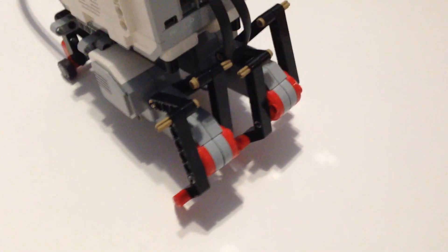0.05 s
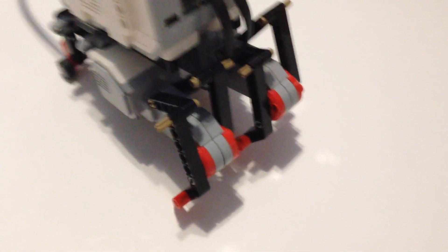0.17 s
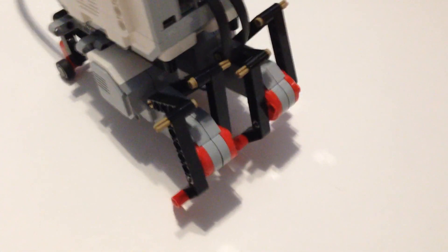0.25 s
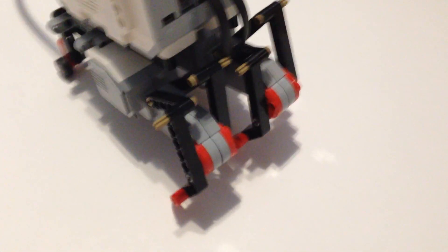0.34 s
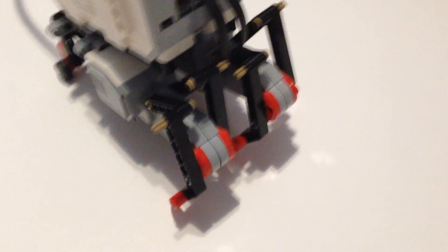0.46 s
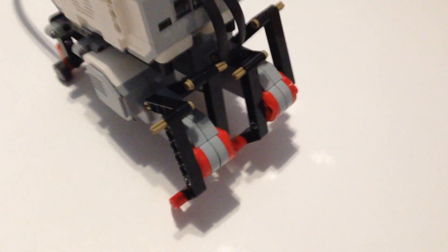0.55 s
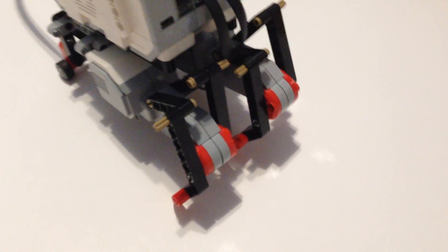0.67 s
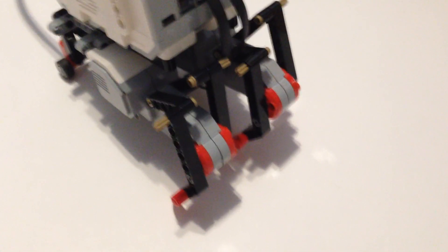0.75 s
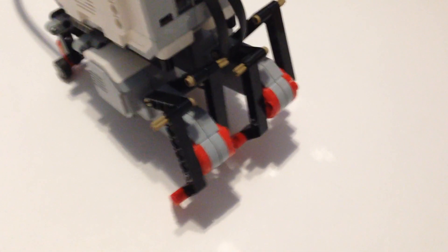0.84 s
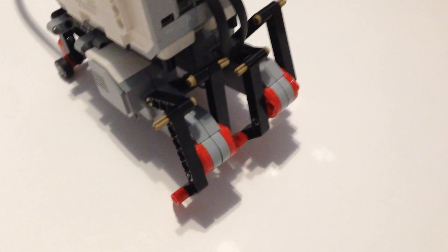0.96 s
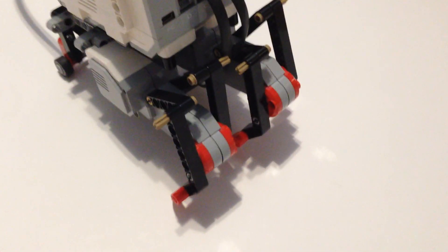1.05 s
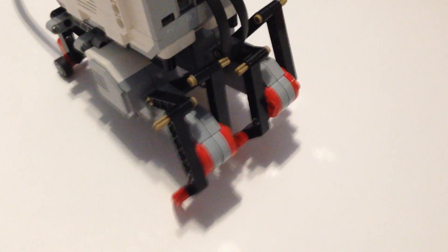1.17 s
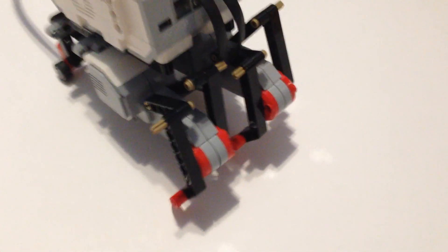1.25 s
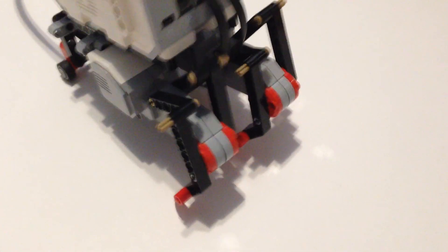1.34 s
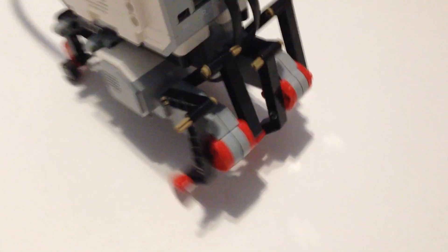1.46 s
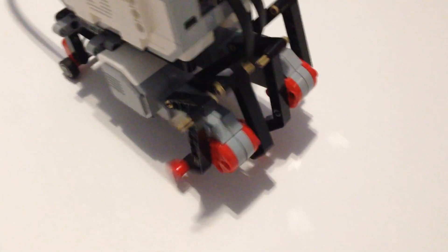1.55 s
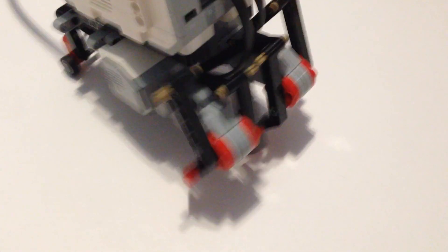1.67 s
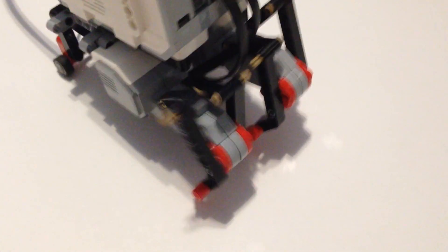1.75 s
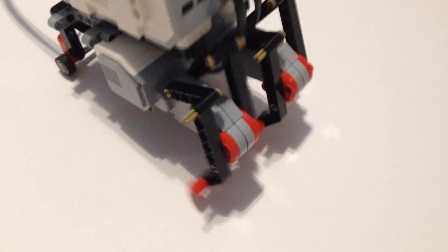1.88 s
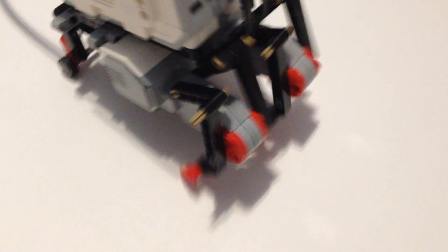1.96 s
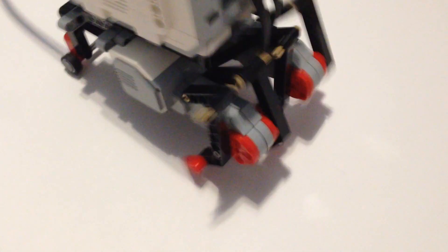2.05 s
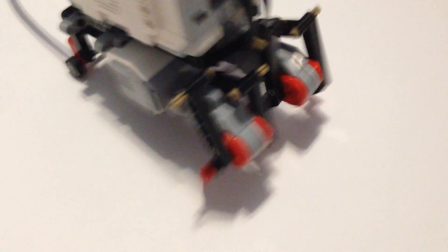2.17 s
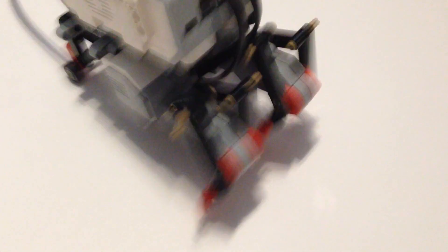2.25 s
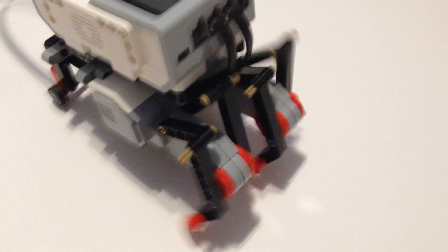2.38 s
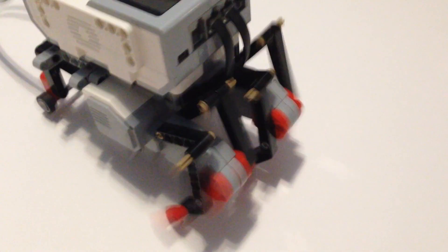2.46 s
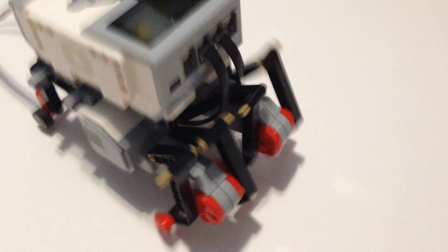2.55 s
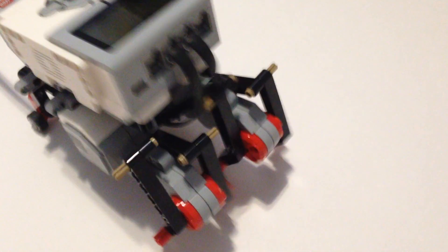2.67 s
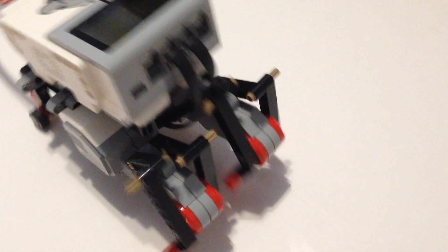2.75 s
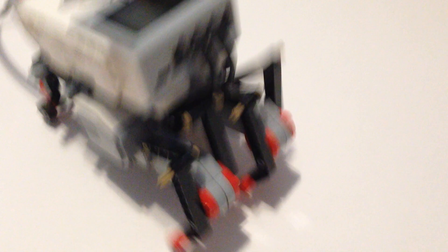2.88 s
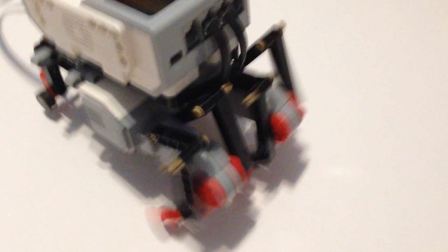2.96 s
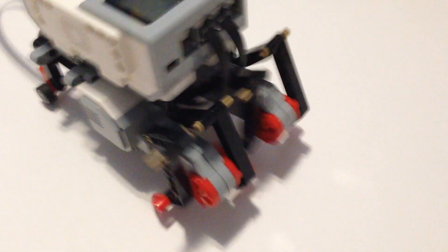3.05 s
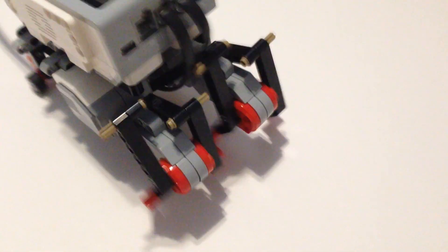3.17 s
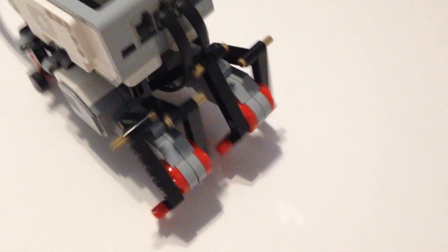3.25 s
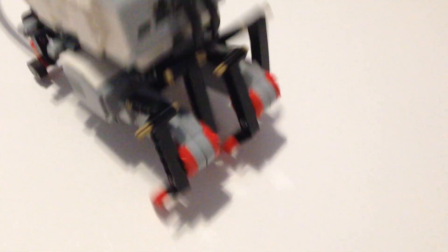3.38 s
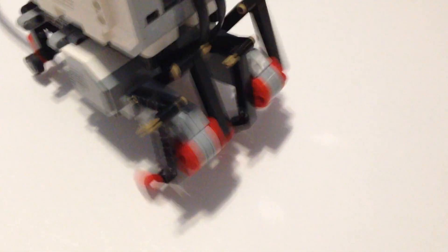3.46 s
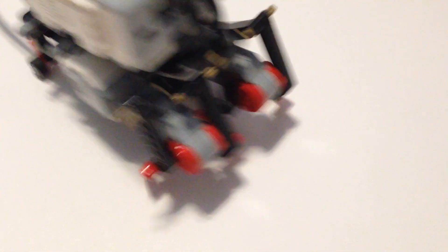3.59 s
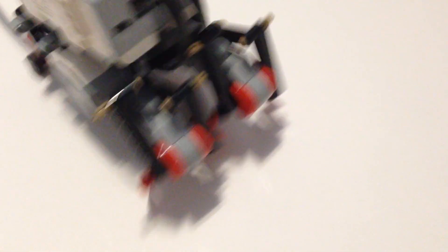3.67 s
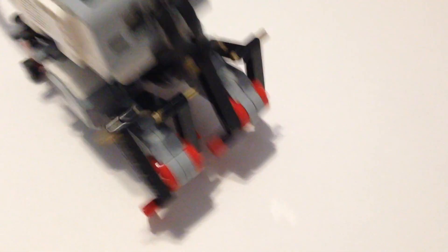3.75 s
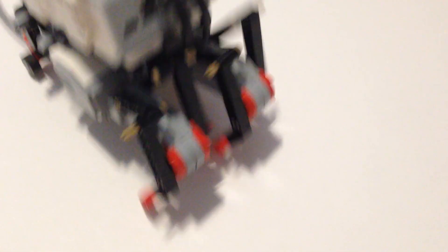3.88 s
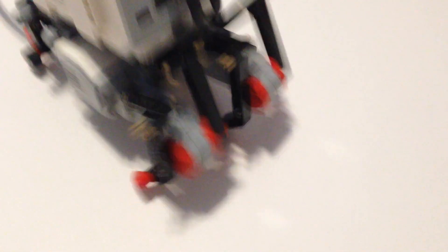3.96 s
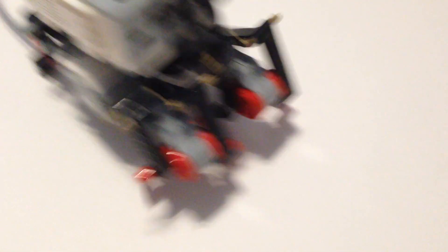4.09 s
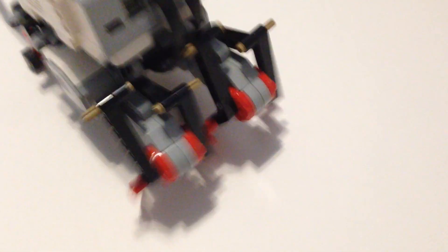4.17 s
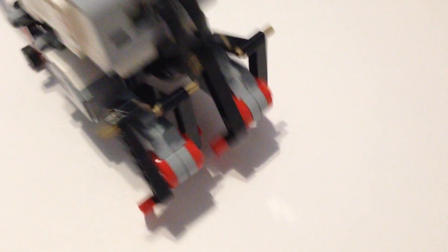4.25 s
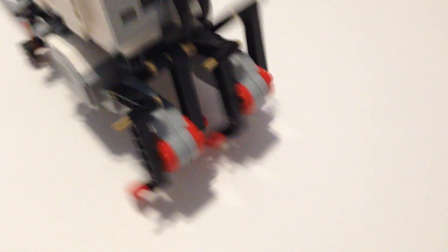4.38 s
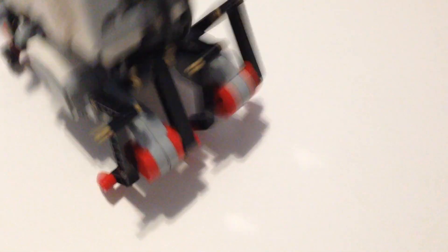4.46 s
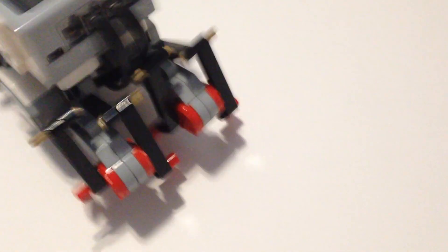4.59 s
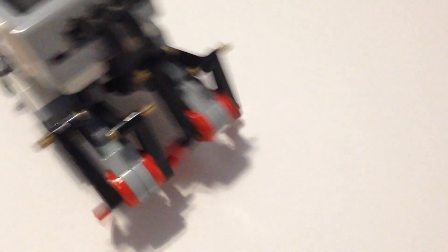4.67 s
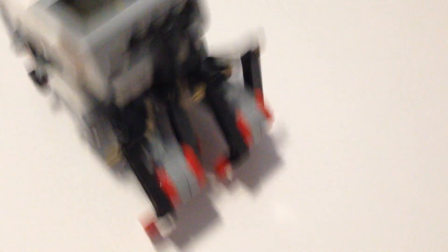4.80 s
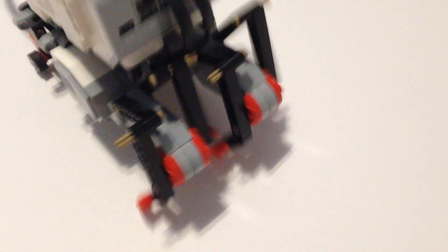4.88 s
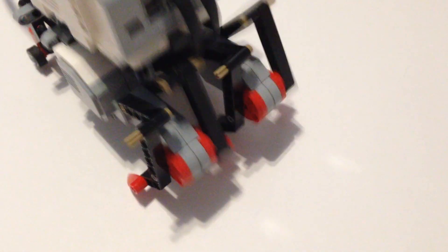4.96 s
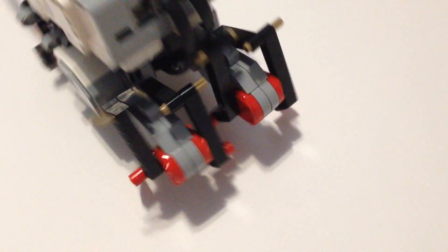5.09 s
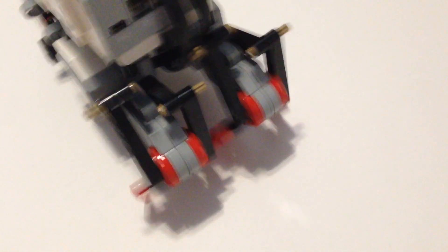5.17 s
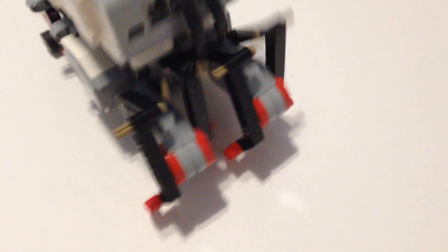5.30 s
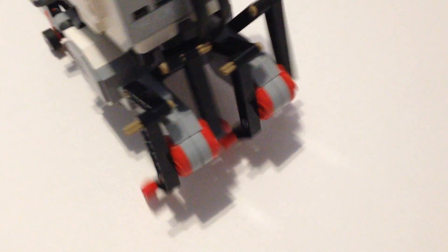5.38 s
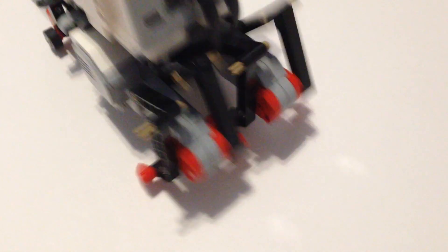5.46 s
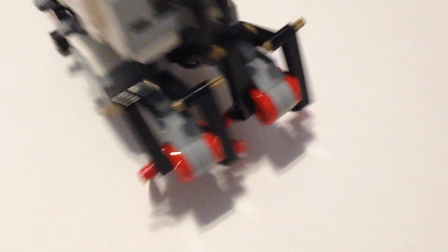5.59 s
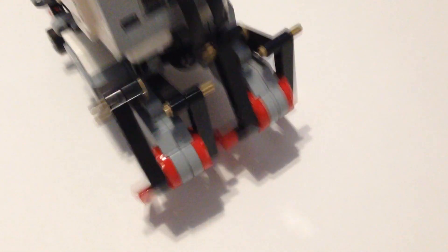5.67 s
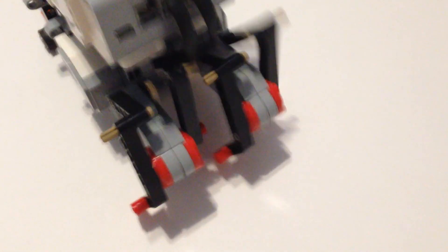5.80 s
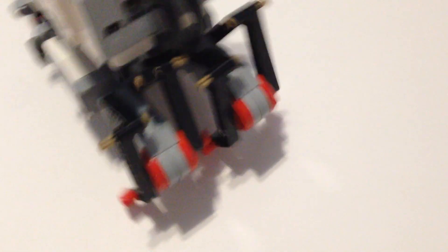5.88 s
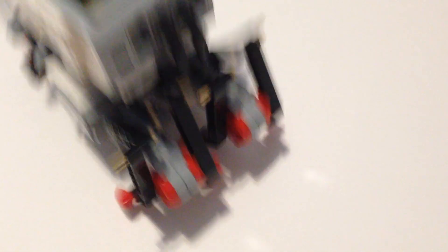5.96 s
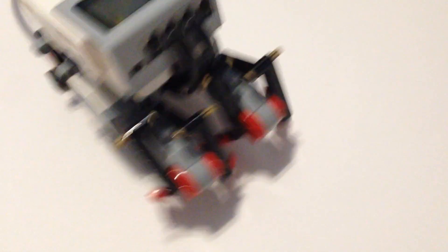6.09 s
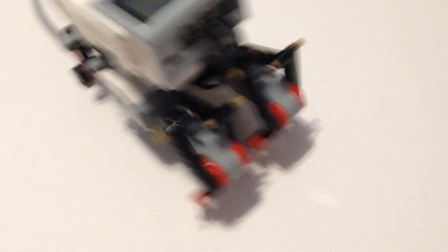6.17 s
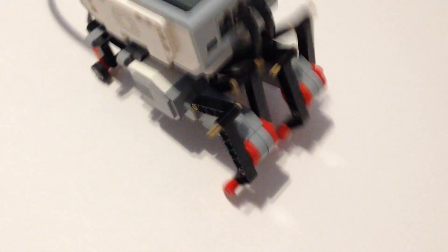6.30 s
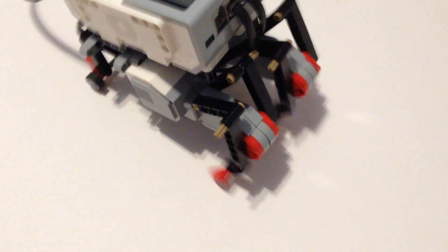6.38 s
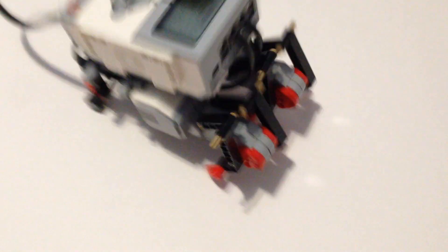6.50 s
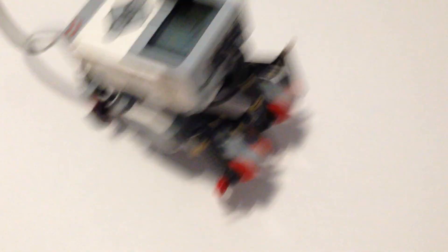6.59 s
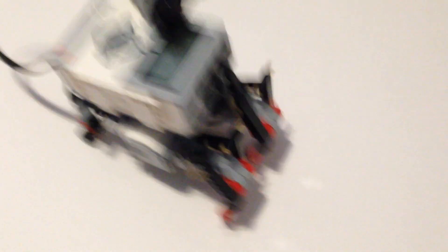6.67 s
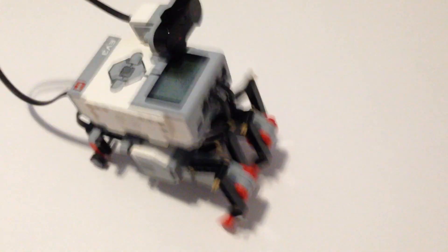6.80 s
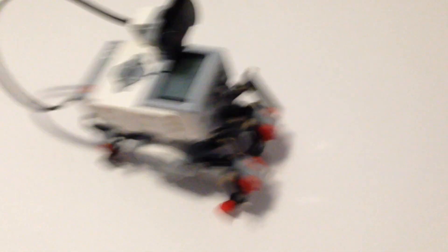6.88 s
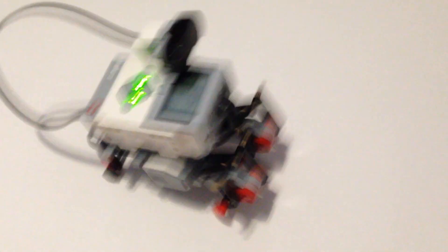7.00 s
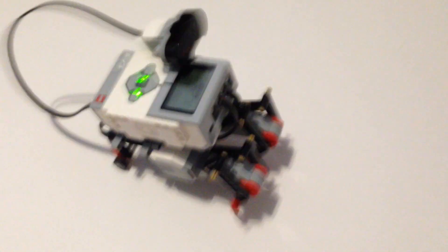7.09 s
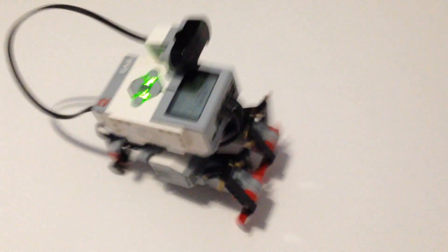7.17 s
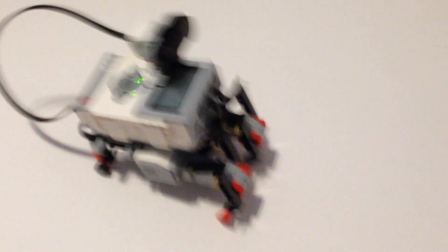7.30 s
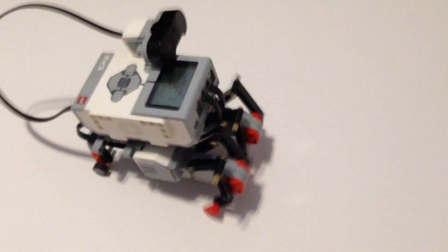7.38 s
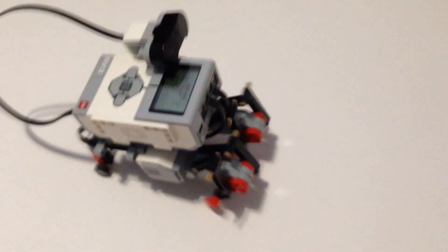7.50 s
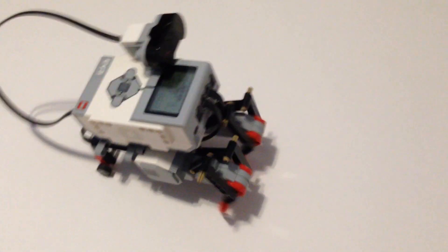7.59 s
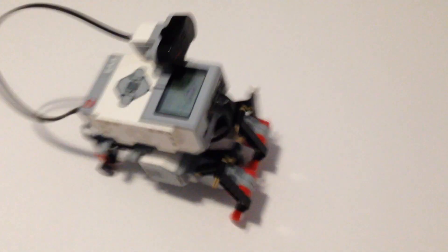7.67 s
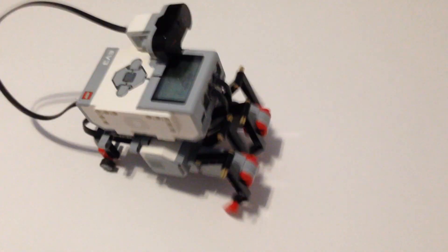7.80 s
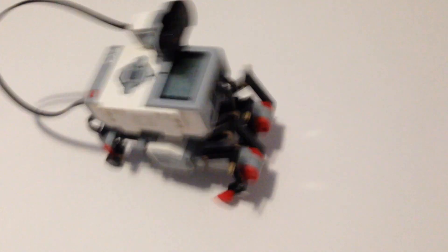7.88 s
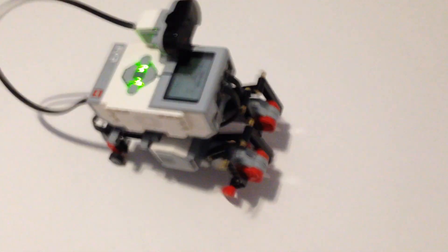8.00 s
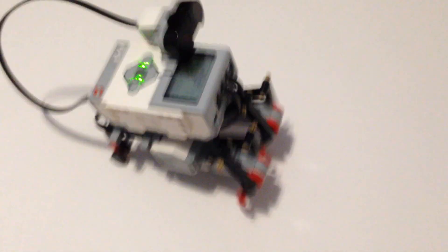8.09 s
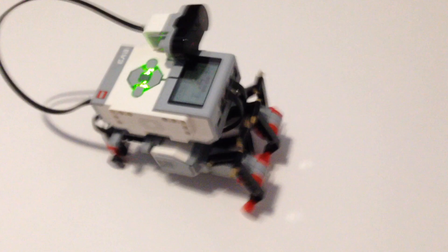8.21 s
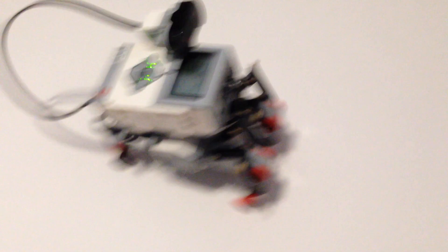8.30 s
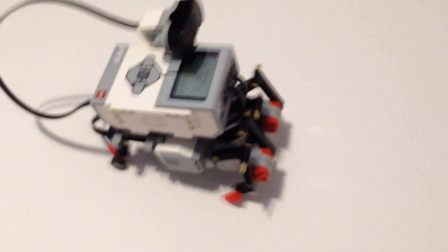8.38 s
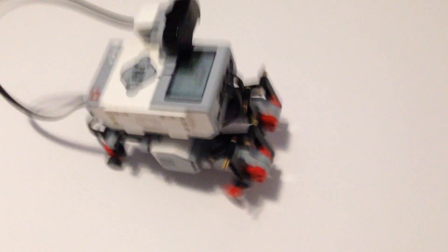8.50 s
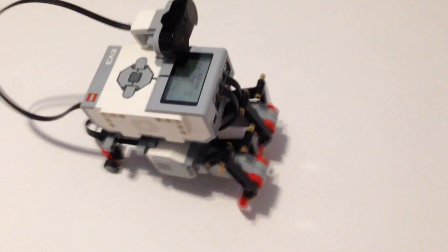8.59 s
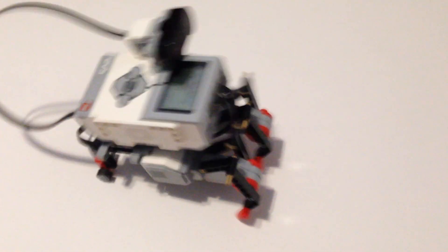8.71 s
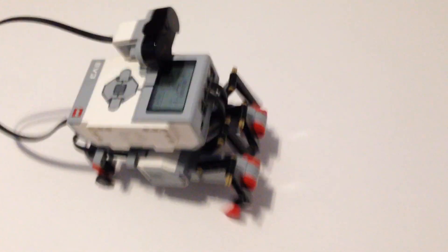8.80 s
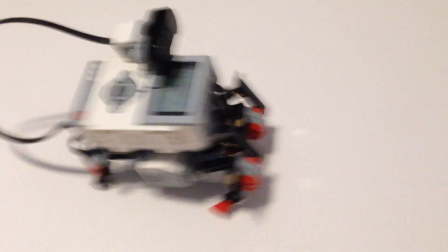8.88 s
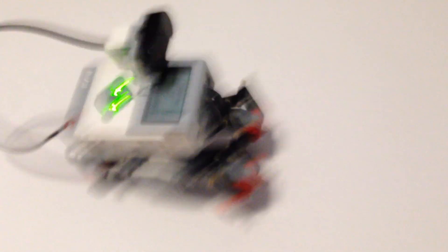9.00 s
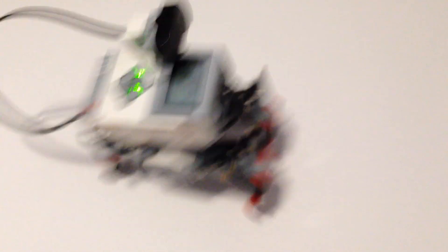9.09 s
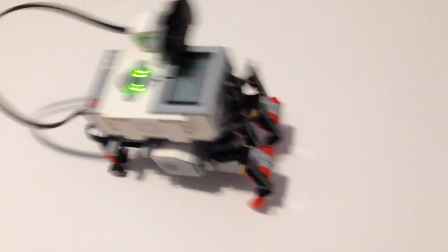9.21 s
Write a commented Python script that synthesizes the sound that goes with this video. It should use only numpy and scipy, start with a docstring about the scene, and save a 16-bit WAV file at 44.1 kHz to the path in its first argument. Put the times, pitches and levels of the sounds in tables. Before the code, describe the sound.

Quiet room hush with faint handling rustle and a few dull plastic clicks, the strongest just over a second in. Then two small geared motors rev up quickly into a bright, grinding rattle with a thin whine. The load surges about twice a second as feet thump the table and loose links clack. Close microphone, drawing back later so everything softens.

```python
"""Walking toy robot

A plastic toy robot stands on a table, gives small clicks, then walks on two geared motors.
Random gear-tooth blows, sliding noise and tones tied to the rotors shake the housing, frame and table.
The load swings with every stride; short rings and noise bursts make feet thump and loose links clack.
Joints squawk as gliding tones. Late in the walk the microphone draws back and the sound grows softer."""
import sys
import numpy as np
from scipy import signal
from scipy.fft import rfft, irfft, next_fast_len
from scipy.io import wavfile
from scipy.ndimage import map_coordinates

SR = 44100
rng = np.random.default_rng(int(sys.argv[2]) if len(sys.argv) > 2 else 0)


def to_wav(s):
    """Save 16-bit WAV."""
    ch = np.atleast_2d(s).T  # columns
    pcm = np.round(np.clip(ch, -1, 1) * 32767)  # PCM
    wavfile.write(sys.argv[1], SR, pcm.astype(np.int16))


N = 407925
TIME = np.arange(N) / SR


def from_db(db):
    """Turn decibels into a gain."""
    return 10 ** (np.asarray(db) / 20)


def rms_one(x):
    """Scale to an average strength (rms) of 1."""
    return x / np.sqrt(np.mean(x ** 2) + 1e-20)


def in_time(rows):
    """Join the rows of a (t, value, ...) table into curves, one value per sample."""
    t, *columns = np.transpose(rows)
    return [np.interp(TIME, t, column) for column in columns]


def drift(rate):
    """Slow random wandering with spread 1, mostly slower than rate (Hz)."""
    step = 40   # samples between the points that are drawn
    r = np.exp(-2 * np.pi * rate * step / SR)
    noise = rng.standard_normal(N // step + 2002)
    slow = signal.lfilter([1], [1, -2 * r, r * r], noise)[2000:]
    return np.interp(np.arange(N) / step, np.arange(len(slow)), rms_one(slow))


def cut(x, hz, kind, order=2):
    """Butterworth filter that keeps the highs ("high") or the lows ("low")."""
    sos = signal.butter(order, min(hz, SR / 2 - 1000), kind, fs=SR, output="sos")
    return signal.sosfilt(sos, x)


def colour(x, spectrum):
    """Shape a steady sound by (f/Hz, level/dB) points."""
    hz, db = np.transpose(spectrum)
    size = next_fast_len(N)
    bins = np.maximum(np.fft.rfftfreq(size, 1 / SR), 1)
    gain = from_db(np.interp(np.log(bins), np.log(hz), db))
    return irfft(rfft(x, size) * gain, size)[:N]


def resonate(x, modes):
    """Let x excite resonances side by side: (f/Hz, width/Hz, level/dB)."""
    out = 0
    for hz, width, db in modes:
        r = np.exp(-np.pi * width / SR)
        poles = [1, -2 * r * np.cos(2 * np.pi * hz / SR), r * r]
        out = out + from_db(db) * (1 - r * r) / 2 * signal.lfilter([1, 0, -1], poles, x)
    return out


def dying(t60):
    """A decay that falls 60 dB in t60 seconds."""
    return from_db(-60 * TIME[:int(t60 * SR) + 2] / t60)


def ring(hz, t60):
    """One struck mode: a dying sine, with little sound below its pitch."""
    decay = dying(t60)
    return cut(decay * np.sin(2 * np.pi * hz * TIME[:len(decay)]), 0.65 * hz, "high")


def crack(t60, low_hz, top_hz, order=2):
    """Countless plastic modes struck at once, as a dying noise burst with peak 1."""
    decay = dying(t60)
    noise = cut(decay * rng.standard_normal(len(decay)), low_hz, "high")
    burst = cut(noise, top_hz, "low", order=order)
    return burst / np.abs(burst).max()


def add(out, t, sound):
    """Mix a sound in at time t (s)."""
    at = min(int(t * SR), N)
    out[at:at + len(sound)] += sound[:N - at]


# colour of the quiet room: (f/Hz, relative level/dB)
AIR = [(15, -54), (25, -26), (36, -11), (59, -2.5), (116, -2.5), (144, -4), (173, -2.5), (482, -19),
       (826, -18.5), (1200, -27.5), (4260, -27), (13500, -31), (15500, -32)]


def room_air():
    """The room's soft hush: steady noise, strongest in the bass."""
    return from_db(-56.5) * rms_one(colour(rng.standard_normal(N), AIR))


# faint rustle of handling: (t/s, base level/dB)
RUSTLE = [(0, -65), (.08, -64), (.15, -81), (.3, -74), (.4, -64), (.47, -67), (.6, -88), (1.3, -95)]


def handling_rustle():
    """Parts rub softly: noise through two broad resonances, its level flickering."""
    noise = resonate(rng.standard_normal(N), [(2200, 1100, 0.5), (4060, 1800, 0)])
    return from_db(in_time(RUSTLE)[0]) * rms_one(noise) * from_db(2.5 * drift(40))


# small knocks before the walk:
# (t/s, ring level/dB, ring f/Hz, ring t60/s, tick base level/dB, tick top f/Hz)
KNOCKS = [(.092, -42, 350, 0.02, -61, 1500), (0.236, -58, 400, .02, -43, 6000),
          (0.493, -42, 400, 0.035, -36.5, 7500), (.497, -31, 264, 0.13, -41, 3200),
          (.509, -35.5, 274, 0.099, -52, 7000), (1.16, -24, 372, 0.036, -21.5, 4300),
          (1.174, -35, 300, .06, -45, 2600), (1.196, -34, 390, 0.025, -36, 2400),
          (1.228, -40, 330, .04, -48, 6500), (1.399, -62, 403, .02, -42, 14500),
          (1.406, -61, 403, .02, -27.5, 14500)]
# resonances of the shell's shiver: (f/Hz, width/Hz, relative level/dB)
SHELL_TAIL_MODES = [(2050, 800, 0), (3700, 1800, -7)]


def knocks():
    """Dull clicks: a low ring and a tick that excites the shell, whose loose parts shiver on."""
    thuds, ticks = np.zeros(N), np.zeros(N)
    for t, db, hz, t60, tick_db, top_hz in KNOCKS:
        add(thuds, t, from_db(db) * ring(hz, t60))
        impulse = cut(signal.unit_impulse(SR // 100), 600, "high", order=1)
        tap = cut(impulse, top_hz, "low", order=10)
        add(ticks, t, from_db(tick_db - 6) * tap / np.abs(tap).max())
        add(ticks, t + 0.00096, from_db(tick_db - 7) * crack(0.017, 660, top_hz, order=10))
    shell = resonate(ticks, [(1950, 800, 2), (4350, 600, 0)])
    shiver = resonate(crack(0.4, 600, 7000), SHELL_TAIL_MODES)
    tail = from_db(-19) * signal.fftconvolve(shell, shiver / np.linalg.norm(shiver))[:N]
    return thuds + ticks + shell + tail


# pace of the walk: (t/s, strides made)
PACE = [(1.38, -1), (1.872, 0), (4.359, 5), (9.255, 15.025)]
# Twice in a stride the gears go slack and race; then a leg takes the weight, they whine and slow down.
# (share of the stride, speed factor, then base swings in level/dB of the bright rattle, low rattle,
# whine and frame drone)
STRIDE = [(.01, 1.025, -0.5, -2.5, -12, 5), (.07, 1.008, 0.1, 0.5, 7, -6), (.14, .99, -1.1, 1, -9, -4),
          (.28, .982, -0.8, -1.5, -0.5, -2), (.39, .99, -0.84, 1.2, -33, -0.5),
          (.46, 1.015, -3, -5.5, -17, 2), (.57, 1.014, -0.3, 1.5, -2, -0.5),
          (.68, .99, -0.74, 0.3, 1.5, -4.5), (.8, .978, -0.75, 0, -10, -0.5),
          (.89, .992, 0.1, 1.5, -15, 1.5), (.96, 1.012, -3, -4, -19, -2)]


def gait():
    """What every stride does to the drive, sample by sample; the pattern sets in with the first steps."""
    strides, = in_time(PACE)
    share, speed, *swings_db = np.transpose(STRIDE)
    walking = np.interp(TIME, [1.8, 2.3], [0, 1])
    factor = 1 + walking * np.interp(strides, share, speed - 1, period=1)
    return [factor] + [walking * np.interp(strides, share, db, period=1) for db in swings_db]


# a leg binds for a moment and the gears surge against it: (middle t/s, half length/s, extra load level/dB)
BINDS = [(2.408, .02, 3.5), (2.583, .016, 5.5), (2.901, .015, 2), (3.073, 0.0099, 6), (3.093, .012, 5),
         (3.406, .018, 2), (3.575, .013, 7), (4.068, .017, 6), (4.555, .02, 3.5), (5.042, .012, 3.5),
         (5.527, .01, 4), (5.776, .012, 2.5), (6.751, .013, 5), (6.985, .015, 2), (7.236, .018, 3),
         (7.717, .014, 3.5), (8.212, .017, 3), (8.7, .016, 2), (9.189, .014, 2)]


def binding():
    """Extra load in dB while a leg binds, as smooth flat-topped bumps."""
    return sum(db / (1 + ((TIME - t) / half) ** 4) for t, half, db in BINDS)


PINION_TEETH = 10   # teeth on the small gear of each motor


def rotor_turns(mesh_hz, wobble):
    """Turns made by a rotor whose speed wavers; mesh_hz is the rate at which teeth meet."""
    return np.cumsum(mesh_hz / PINION_TEETH * (1 + wobble * drift(14))) / SR


def tooth_rattle(turns, spread_db, eccentric, sliding):
    """Each tooth strikes with its own force and timing, harder once a turn, and slides on its neighbour.

    Slack between the teeth (backlash) makes the rattle swell and sink."""
    teeth = np.flatnonzero(np.diff(np.floor(turns * PINION_TEETH)))
    late = rng.integers(0, 9, len(teeth))   # samples
    force = from_db(spread_db * rng.uniform(-0.95, 1, len(teeth)))
    clicks = np.zeros(N)
    clicks[np.minimum(teeth + late, N - 1)] = rng.choice([-1, 1], len(teeth)) * force
    chatter = from_db(1.7 * np.minimum(drift(70), 2))
    contact = rms_one(clicks) + sliding * rng.standard_normal(N)
    return chatter * contact * (1 + eccentric * np.sin(2 * np.pi * turns))


def gear_profile(turns, ratio, size=420):
    """Flaws round a wheel return on its every turn: a comb of partials that glide with speed."""
    flaws = rng.standard_normal(size)
    return rms_one(map_coordinates(flaws, [turns / ratio % 1 * size], order=3, mode="grid-wrap"))


def shifting_contact(x, depth_db, rate, count=26):
    """As the parts shift in their play, each band of the shell is driven harder or more softly."""
    size = next_fast_len(N)
    spectrum = rfft(x, size)
    centres = np.geomspace(1300, 14000, count)   # middle of each overlapping band, Hz
    place = np.interp(np.fft.rfftfreq(size, 1 / SR), centres, np.arange(count))
    out = 0
    for k in range(count):
        band = irfft(spectrum * np.maximum(1 - np.abs(place - k), 0), size)[:N]
        out = out + band * from_db(depth_db * drift(rate))
    return out


# housing resonances: (f/Hz, width/Hz, level/dB)
HOUSING_MODES = [(1625, 140, -11.5), (1980, 140, -34), (2880, 53, -62), (4050, 210, -10), (5400, 300, -37),
                 (5930, 280, -6.5), (6610, 600, -4), (7540, 480, -7), (10100, 950, -19.5)]
# colour of the housing from close by, then from farther back: (f/Hz, relative level/dB)
HOUSING_NEAR = [(760, -35), (1300, -12), (1530, -3.5), (1930, 0), (2800, -4), (3240, -5), (3900, -1.5),
                (4560, -3), (5270, 1.5), (6290, -8), (7660, -3.5), (10300, -3), (11400, -10.5),
                (14600, -15), (15500, -26)]
HOUSING_FAR = [(760, -28.5), (1300, -8.5), (1770, -4), (1990, 0), (2370, -7), (3380, -7.5), (4030, -4),
               (4510, -7.5), (5010, -1.5), (6220, -8.5), (7580, -4.5), (8320, -6), (10600, -8),
               (14100, -18), (15500, -19)]


def housing(rattle):
    """The shell rings with the rattle; its colour shifts as the microphone draws back."""
    rung = rattle + resonate(rattle, HOUSING_MODES)
    far = np.interp(TIME, [5.9, 6.8], [0, 1])
    near_sound = rms_one(colour(rung, HOUSING_NEAR))
    far_sound = rms_one(colour(rung, HOUSING_FAR))
    return (1 - far) * near_sound + far * far_sound


def whine(turns, orders, flutter_db, play):
    """Tones locked to the rotor; play in the gears shakes their phase (radians) and level."""
    tones = 0
    for multiple, db in orders:
        level = np.sqrt(2) * from_db(db + flutter_db * drift(25))
        tones = tones + level * np.sin(2 * np.pi * multiple * turns + play * drift(35))
    return tones


# a dry gear sings for a while: (t/s, base f/Hz, base level/dB)
SINGING = [(1.4, 5200, -53), (1.93, 5250, -34), (2.1, 5180, -61), (3.3, 5095, -39.5), (4.57, 4970, -38.5),
           (4.64, 4930, -35), (4.73, 4850, -37), (4.92, 5000, -37), (5.3, 5060, -37.5), (5.7, 5070, -37.5),
           (6.0, 5046, -38), (6.7, 5070, -60)]


def singing():
    """Friction keeps a narrow resonance going: a bending tone inside a rough band."""
    hz, db = in_time(SINGING)
    phase = 2 * np.pi * np.cumsum(hz * (1 + 0.012 * drift(18.3))) / SR
    in_step, across = rms_one(cut(rng.standard_normal((2, N)), 110, "low"))
    tone = (in_step + 1.2) * np.cos(phase) + across * np.sin(phase)
    return from_db(db + 1) * rms_one(tone)


# effort of the drive, fading as the microphone draws back:
# (t/s, then base level/dB of the bright rattle, low rattle and frame drone)
LOAD = [(1.38, -62, -74, -77), (1.42, -37, -44, -54), (1.445, -25.5, -32, -58), (1.49, -26, -33.5, -56),
        (1.64, -30.5, -40.5, -39.5), (1.78, -24.5, -39.5, -52), (1.84, -31, -48, -36.5),
        (1.97, -25, -34.5, -48), (2.09, -29, -40, -42.5), (2.24, -25.5, -34, -40), (2.95, -26, -34, -40),
        (3.45, -27, -33.5, -39.5), (3.53, -28.5, -36, -42), (3.66, -27.5, -35.5, -41),
        (4.4, -29, -36, -41.5), (6.0, -28.5, -35.5, -42), (7.1, -32.5, -40, -48), (9.25, -32.5, -39, -47.5)]
# the motors run up, then roughly hold their speed: (t/s, base tooth mesh f/Hz)
SPEED = [(1.42, 892), (1.47, 1258), (1.49, 1419), (1.53, 1596), (1.58, 1800), (1.68, 2018), (1.785, 1905),
         (1.88, 2050), (1.94, 2018), (2.07, 1827), (2.45, 1972), (4.75, 1957), (5.6, 1980), (6.4, 1967),
         (9.25, 1990)]
# base level of the mesh tone: (t/s, level/dB)
WHINE = [(1.42, -72), (1.46, -52), (1.55, -51), (1.62, -58), (1.75, -46), (2.4, -52), (4.5, -45),
         (6.5, -44.5), (9.25, -45)]
# the mesh tone and a weaker partial a fifth above: (multiple of rotor speed, relative level/dB)
WHINE_ORDERS = [(10, 0), (15, -11)]
# partials that stand out while the motors run up: (multiple of rotor speed, relative level/dB)
RUN_UP_ORDERS = [(10, -1), (13.8, -3), (15, -4), (17, -5), (20, -7)]
# their shared level: (t/s, level/dB)
RUN_UP = [(1.42, -60), (1.46, -47), (1.52, -45), (1.57, -48), (1.63, -56), (1.73, -47), (1.82, -65),
          (1.95, -110)]
# overtones of the mesh tone: (multiple of rotor speed, relative level/dB)
MESH_OVERTONES = [(20, 0), (30, -12), (40, -11)]
# frame resonances: (f/Hz, width/Hz, relative level/dB)
FRAME_MODES = [(1048, 73, -3.5), (1126, 65, -1)]
# second gear stage, drumming the frame: (multiple of rotor speed, relative level/dB)
FRAME_ORDERS = [(4.5, -16), (5.04, -5.5), (5.55, -6.5), (6, -14), (8, -16), (8.4, -20), (12.7, -20),
                (15.2, -18), (18.3, -12)]
# table top under the walking robot: (f/Hz, width/Hz, relative level/dB)
TABLE_MODES = [(81.5, 17, 0.5), (156, 15, -3), (192, 18.4, 9), (260.6, 41, 10), (326, 42, 0.5),
               (430, 54, -23), (670, 510, -5)]


def motors():
    """Two motors at nearly the same speed drive the housing, the frame and the table."""
    factor, bright_swing, low_swing, whine_swing, drone_swing = gait()
    bright_db, low_db, drone_db = in_time(LOAD)
    strain_db = binding()
    set_hz, = in_time(SPEED)
    # each dB of binding costs 2 % of the speed
    mesh_hz = set_hz * factor * (1 + 0.004 * drift(6) - 0.02 * strain_db)
    # the table's hum follows the low rattle part of the way
    rumble_db = -53 + 0.63 * (low_db - np.median(low_db))
    bright_db = bright_db + 0.91 * bright_swing + strain_db + 0.39 * drift(6.2)
    low_db = low_db + low_swing + strain_db + 0.89 * drift(13)
    drone_db = drone_db + drone_swing + 0.52 * strain_db

    lead = rotor_turns(mesh_hz, wobble=0.004)
    follower = rotor_turns(mesh_hz, wobble=0.015)
    rattle = tooth_rattle(lead, spread_db=6, eccentric=0.18, sliding=0.58)
    rattle += tooth_rattle(follower, spread_db=6, eccentric=0.089, sliding=0.59)
    grind = gear_profile(lead, ratio=5, size=700) + gear_profile(follower, ratio=3)

    # the faster the gears turn, the harder they bounce
    bounce = (mesh_hz / np.median(mesh_hz)) ** 2
    drive = np.sqrt(bounce) * rattle + np.minimum(bounce, 1) * grind
    contact = shifting_contact(drive, depth_db=2, rate=15.3)
    shell = housing(contact * from_db(0.46 * drift(35)))
    bright = from_db(bright_db - 2) * rms_one(cut(shell, 3620, "high", order=4))
    low = from_db(low_db - 3) * rms_one(cut(shell, 3030, "low", order=4))

    whine_db, = in_time(WHINE)
    run_up_db, = in_time(RUN_UP)
    tones = from_db(whine_db + whine_swing) * whine(lead, WHINE_ORDERS, flutter_db=3.5, play=0.45)
    tones += from_db(run_up_db) * whine(lead, RUN_UP_ORDERS, flutter_db=2.5, play=0.6)
    # the overtones turn rough under heavy load
    roughness = np.interp(bright_db, [-33, -27], [0.7, 1.05])
    overtones = whine(lead, MESH_OVERTONES, flutter_db=3.5, play=roughness)
    overtones += whine(follower, MESH_OVERTONES, flutter_db=3.5, play=roughness)
    overtone_db = bright_db - 20.5 + 0.7 * whine_swing
    tones += from_db(overtone_db) * np.minimum(bounce, 1) ** 2 * overtones

    frame = from_db(-4 + 0.53 * drone_swing) * rms_one(resonate(rattle, FRAME_MODES))
    # the heavier second stage evens out the swings in speed, keeping only 65 % of them
    steady = rotor_turns(set_hz * (1 + 0.65 * (factor - 1)), wobble=0.006)
    frame += from_db(-3 - 0.3 * drone_swing) * whine(steady, FRAME_ORDERS, flutter_db=3.5, play=0.35)
    drone = from_db(drone_db) * cut(frame, 828, "high", order=6)

    # some of the gears' shaking reaches the table through the feet
    rumble = from_db(rumble_db + 2.64 * drift(2.9)) * rms_one(resonate(rattle, TABLE_MODES))
    # the singing swings 2.1 dB for each dB of the stride's bright swing
    song = from_db(2.1 * bright_swing) * singing()
    running = np.interp(TIME, [1.39, 1.41], [0, 1])
    return running * (bright + low + tones + drone + rumble + song)


def squawk(length, hz):
    """A plastic joint sticks and slips for a moment, its rough tone sagging."""
    progress = np.linspace(-1, 1, int(length * SR))
    rough = rms_one(cut(rng.standard_normal(SR // 4), 310, "low"))[:len(progress)]
    phase = 2 * np.pi * np.cumsum(hz * (1 - 0.014 * progress + 0.015 * rough)) / SR
    return np.sqrt(2) * np.cos(np.pi * progress / 2) * np.sin(phase)


# joints squawking under load: (middle t/s, length/s, middle f/Hz, level/dB)
SQUAWKS = [(1.425, 0.04, 2880, -45), (1.463, 0.036, 1104, -40), (1.478, .03, 2780, -39),
           (1.755, .06, 2850, -41), (1.76, 0.082, 5830, -33), (1.942, 0.05, 4020, -28.5),
           (1.961, 0.14, 7760, -34), (1.966, .07, 2600, -38), (2.585, 0.0405, 2800, -30),
           (3.077, 0.031, 3830, -29), (3.08, 0.039, 2868, -32), (4.059, 0.034, 2750, -38)]
CHIRPS_PER_S, CHIRP_S = 24, 0.037   # average rate and length of the tiny slips
CHIRP_LOW_HZ, CHIRP_HIGH_HZ = 2084, 8480


def squawks():
    """A few loud slips in the joints, and tiny random chirps that follow the load."""
    out, chirps = np.zeros(N), np.zeros(N)
    for t, length, hz, db in SQUAWKS:
        add(out, t - length / 2, from_db(db) * squawk(length, hz))
    start = LOAD[0][0]
    span = TIME[-1] - start
    for when, pitch, strength in rng.random((int(CHIRPS_PER_S * span), 3)):
        hz = CHIRP_LOW_HZ * (CHIRP_HIGH_HZ / CHIRP_LOW_HZ) ** pitch
        level = from_db(2.5 * (2 * strength - 1))
        add(chirps, start + when * span, level * squawk(CHIRP_S, hz))
    chirp_db = in_time(LOAD)[0] + binding() - 13.5
    return out + from_db(chirp_db) * chirps


# slack links snapping over: (t/s, base level/dB)
SNAPS = [(1.6074, -31), (1.8739, -20), (2.1388, -12), (2.87, -22), (3.6413, -27), (3.8898, -17),
         (4.366, -19), (4.8508, -11), (5.04, -16), (5.5267, -19), (6.081, -13), (6.7446, -22),
         (7.5524, -25), (7.778, -16.5), (9.011, -19), (9.1834, -22)]
# legs clattering as the weight shifts: (t/s, base level/dB, t60/s)
CLATTERS = [(1.788, -6, 0.035), (1.80, -9.5, 0.046), (2.372, -15, 0.066), (2.41, -18, .07),
            (2.586, -14, 0.053), (2.597, -7.5, 0.036), (2.619, -8.5, 0.048), (2.9, -17, 0.089),
            (3.088, -6.5, 0.059), (3.116, -9, 0.039), (3.136, -17, .04), (3.577, -12, 0.068),
            (3.598, -11.5, .05), (4.064, -15, 0.08), (4.303, -18, .04)]


def linkage():
    """Pins snap across their slack; whole legs clatter when the weight shifts and ring the housing."""
    snaps, clatters = np.zeros(N), np.zeros(N)
    for t, db in SNAPS:
        add(snaps, t, from_db(db + 1.5) * crack(0.009, 5000, 10000))
        add(snaps, t, from_db(db - 8) * crack(0.035, 1100, 14000))
    for t, db, t60 in CLATTERS:
        add(clatters, t, from_db(db - 4.5) * crack(t60, 1570, 11500))
        add(clatters, t, from_db(db - 24.5) * ring(1123, 0.066))
    return snaps + clatters + resonate(clatters, HOUSING_MODES)


# feet landing and rocking:
# (t/s, base level/dB, base knock f/Hz, t60/s of the table's ring, base level/dB of its boom)
STEPS = [(1.633, -41.5, 330, 0.07, -68), (1.684, -35, 321, .12, -68), (1.795, -36.5, 348, .1, -47),
         (1.872, -36, 275, .17, -61), (2.371, -32.5, 258.2, 0.14, -53), (2.40, -35, 298, 0.12, -66),
         (2.428, -37.5, 287, 0.098, -63), (2.612, -31.5, 280, 0.25, -45), (2.869, -39, 319.8, 0.081, -60),
         (2.901, -39, 352, 0.08, -68), (3.106, -30.5, 318, 0.13, -45), (3.412, -38, 267, .17, -56),
         (3.456, -42, 299.8, 0.083, -66), (3.595, -38, 369.7, 0.083, -58), (3.82, -43, 280, .14, -65),
         (3.861, -36, 300.3, .14, -55), (4.073, -37, 341, 0.098, -64), (4.109, -40, 274, 0.097, -51),
         (4.359, -36.5, 278, 0.22, -53), (4.549, -39, 313.7, 0.13, -67), (4.605, -40, 325.6, .12, -53.5),
         (4.617, -39, 440, 0.054, -62), (4.849, -33.5, 265, 0.32, -58.5), (5.036, -38.5, 264.8, 0.16, -61),
         (5.279, -42, 280.7, .2, -64), (5.335, -31.5, 274, 0.19, -53), (5.525, -40, 278.2, .12, -59),
         (5.587, -40.5, 292, 0.1305, -65), (5.825, -31, 323, .12, -56), (6.08, -41, 270.8, .12, -49),
         (6.316, -32.5, 356, .12, -60), (6.574, -46, 263.2, 0.11, -47.5), (6.8, -35.5, 309.7, .12, -52),
         (7.022, -41, 277.7, .14, -56), (7.29, -40, 368, .08, -68), (7.777, -34.5, 290, .1, -55),
         (8.268, -32, 297, 0.088, -62), (8.549, -45, 270.5, 0.088, -58), (8.754, -39, 327.5, 0.083, -62),
         (9.24, -36, 289.7, 0.098, -60)]
REBOUND_S = 0.016   # average spacing of the rebounds


def footfalls():
    """A foot knocks and chatters to rest; the table rings and booms, the frame clacks just after."""
    out = np.zeros(N)
    chances = rng.uniform(-1.015, 1, (len(STEPS), 3, 2))   # three rebounds: timing and pitch
    for (t, db, hz, t60, boom_db), chance in zip(STEPS, chances):
        # foot, table ring, dull thud, frame
        add(out, t, from_db(db + 6.5) * ring(1.07 * hz, 0.036))
        add(out, t + 0.00628, from_db(db - 2) * ring(263.6, t60))
        add(out, t, from_db(db + 1) * crack(0.066, 260, 700))
        add(out, t + 0.008, from_db(db - 4) * ring(1109, 0.067))
        for k, (late, pitch) in enumerate(chance):
            when = t + REBOUND_S * (k + 1 + 0.403 * late)
            rebound = from_db(db - 7.5 - 7 * k)   # each one 7 dB softer
            add(out, when, rebound * ring(hz * (1.15 + 0.3 * pitch), 0.029))
            add(out, when, rebound * crack(0.023, 450, 1500))
        # the table's boom
        add(out, t + 0.0211, from_db(boom_db + 2.5) * ring(84.2, 0.4))
        add(out, t + 0.015, from_db(boom_db + 6.5) * crack(0.42, 48, 123, order=4))
    return out


def room(x, t60, wet_db):
    """Add a short, dull tail from the nearby walls, made of dying noise."""
    decay = dying(t60)
    late = TIME[:len(decay)] > 0.004
    tail = cut(decay * rng.standard_normal(len(decay)) * late, 3150, "low")
    return x + from_db(wet_db) * signal.fftconvolve(x, tail / np.linalg.norm(tail))[:N]


def scene():
    """The robot in a quiet room."""
    robot = handling_rustle() + knocks() + motors() + squawks() + linkage() + footfalls()
    return (room_air() + room(robot, t60=0.34, wet_db=-18))[None]


def record(dry):
    """Cut the top steeply above 15400 Hz."""
    return signal.sosfilt(signal.ellip(10, 0.1, 70, 15400, fs=SR, output="sos"), dry)


dry = scene()
out = record(dry)
to_wav(out)
```